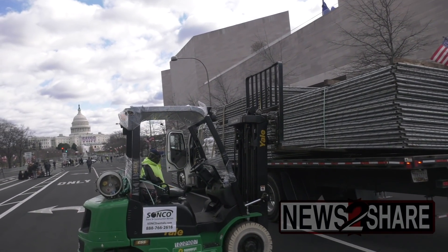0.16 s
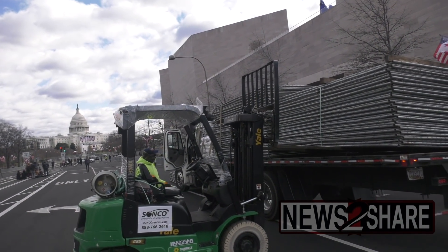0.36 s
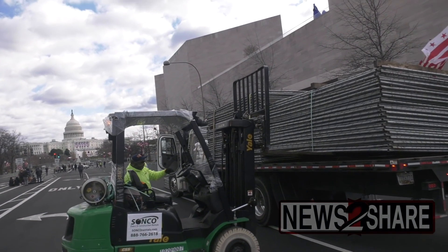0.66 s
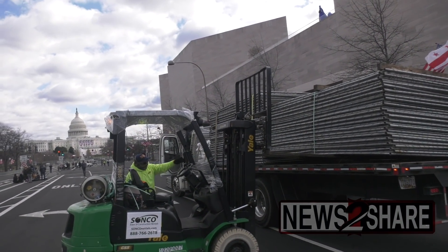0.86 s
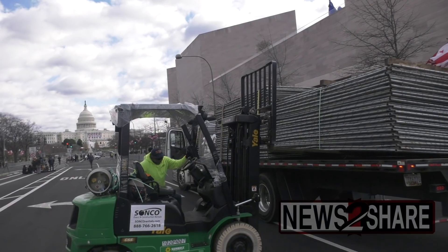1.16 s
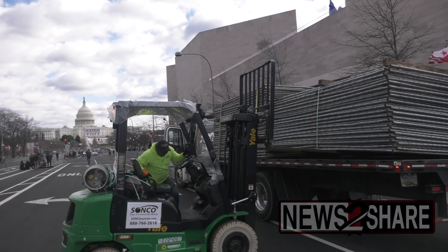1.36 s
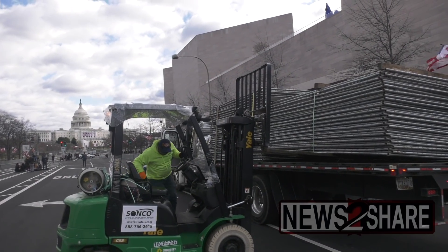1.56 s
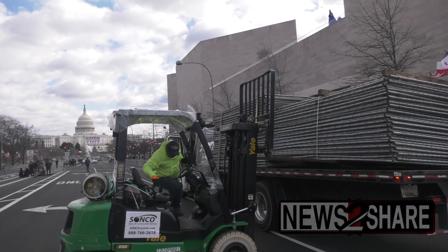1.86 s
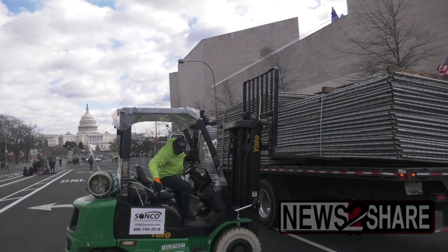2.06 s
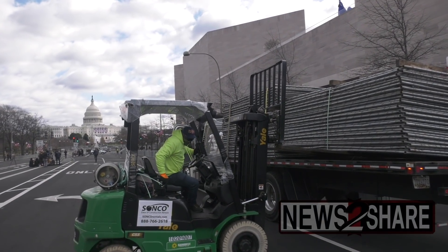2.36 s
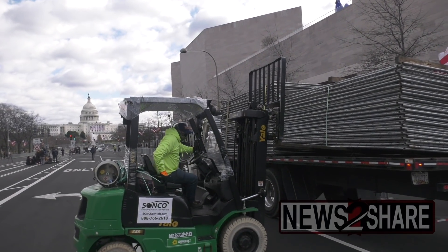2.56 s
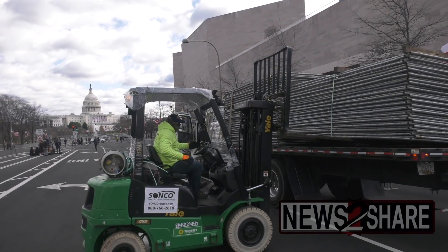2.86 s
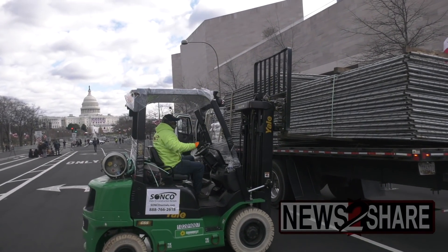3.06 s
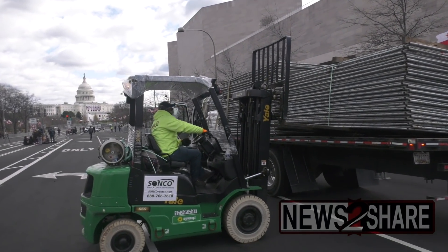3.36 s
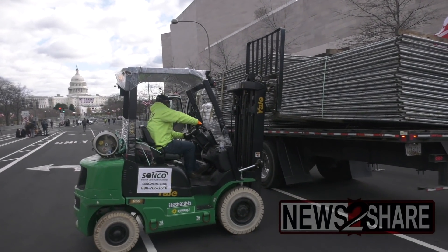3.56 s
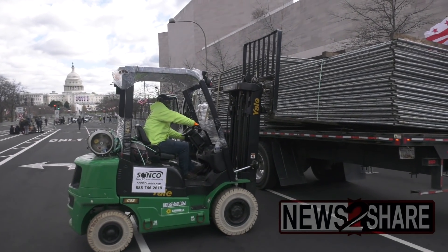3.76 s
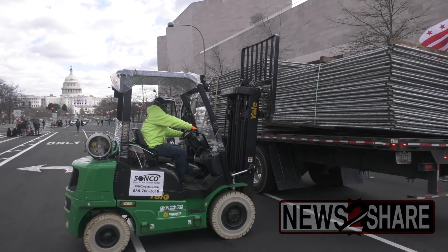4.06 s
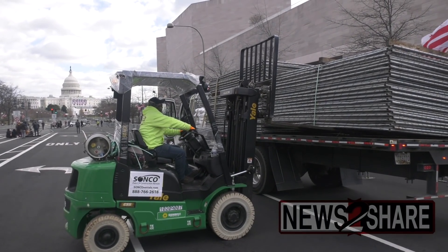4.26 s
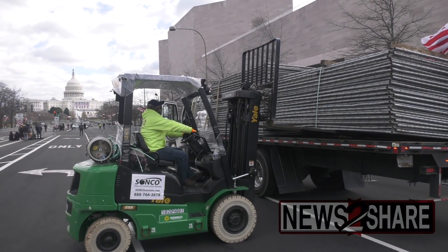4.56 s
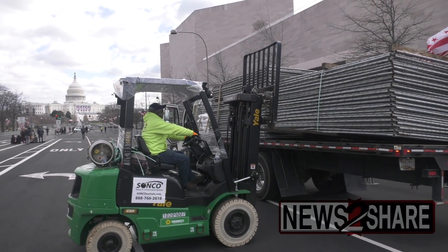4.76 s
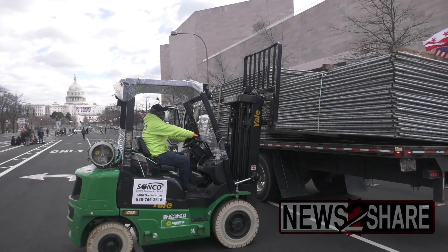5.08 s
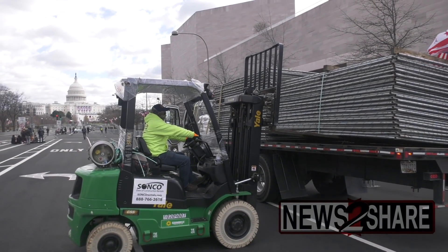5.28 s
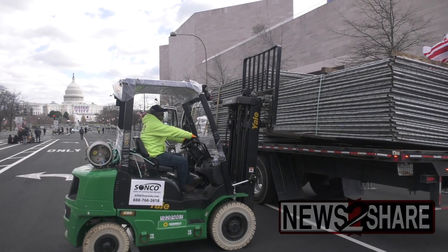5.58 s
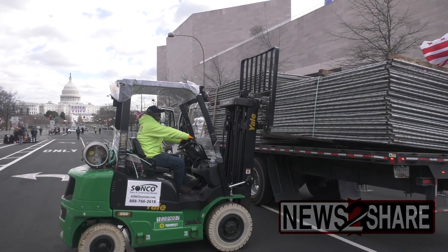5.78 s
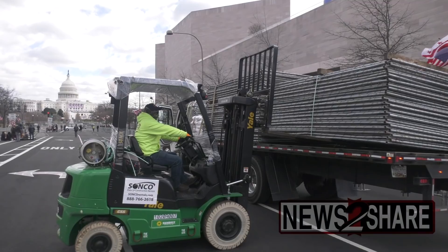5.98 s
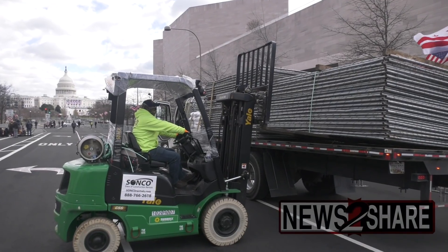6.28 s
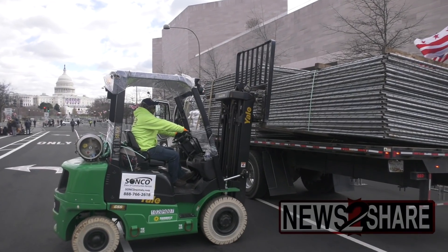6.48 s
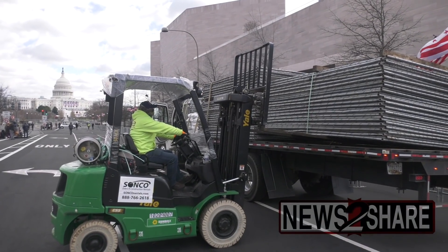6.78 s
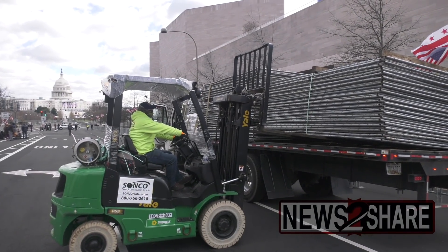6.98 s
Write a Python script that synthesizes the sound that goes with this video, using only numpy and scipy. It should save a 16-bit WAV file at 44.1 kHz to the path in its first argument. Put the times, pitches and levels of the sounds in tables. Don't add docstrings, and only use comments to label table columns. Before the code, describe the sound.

Low wind buffeting dominates an open street as a forklift's pump whines and fan hisses, with a crisp click, faint ticks and rubs.

```python
import sys
import numpy as np
from scipy import signal
from scipy.fft import rfft, irfft, next_fast_len
from scipy.io import wavfile
from scipy.ndimage import uniform_filter1d

SR = 44100
rng = np.random.default_rng(int(sys.argv[2]) if len(sys.argv) > 2 else 0)


def dump_mix(stems):
    frames = np.atleast_2d(stems).T
    limited = np.clip(frames, -1, 1)
    pcm = np.round(limited * 32767).astype(np.int16)
    wavfile.write(sys.argv[1], SR, pcm)


def volts(x):
    e = np.asarray(x, float) / 20
    return 10 ** e


N = 314433
T = np.arange(N) / SR
SIZE = next_fast_len(N)
HZ = np.fft.rfftfreq(SIZE, 1 / SR)
TEETH_PER_FIRING = 6


def curve(table):
    s, *columns = np.transpose(table)
    return [np.interp(T, s, column) for column in columns]


def colour(points):
    hz, db = np.transpose(points)
    return volts(np.interp(np.log(HZ + 1), np.log(hz), db, left=-200, right=-200))


def bell(hz, width_hz):
    return np.exp(-.5 * ((HZ - hz) / width_hz) ** 2)


def noise(gain):
    x = irfft(rfft(rng.standard_normal(SIZE)) * gain, SIZE)[:N]
    return x / np.std(x)


def walk(rate):
    knots = uniform_filter1d(np.repeat(rng.standard_normal(400), 8), size=12)
    return 1.36 * np.interp(T * np.clip(rate, .1, 50) * 8, np.arange(len(knots)), knots)


def swell(s, length_s):
    return np.sin(np.pi * np.clip((T - s) / length_s, 0, 1))


# start_s, sag_hz, bite_s, recover_s
LOADS = [
    (1.72, 2.0, .22, .22),
    (3.76, 1.4, .15, .2),
    (5.74, 2.9, .12, 6),
    (6.74, 3.0, .2, 9),
]


def tooth_rate():
    idle_hz, hunt_hz = 170.8, .4
    hz = idle_hz + hunt_hz * walk(7)
    for s, sag_hz, bite_s, recover_s in LOADS:
        bite = np.clip((T - s) / bite_s, 0, 1)
        hz = hz - sag_hz * bite * np.exp(-np.clip(T - s - bite_s, 0, None) / recover_s)
    return hz


# time_s, state
STANCE = [
    (0, 0),
    (2.2, 0),
    (2.8, 1),
    (5.78, 1),
    (5.86, 2),
    (6.76, 2),
    (6.8, 3),
    (7.13, 3),
]


def in_state(levels_db):
    stance, = curve(STANCE)
    return np.interp(stance, np.arange(len(levels_db)), levels_db)


# tooth_rate_multiple, first_db, second_db, load_db, shift_db
TEETH = [(2, -46, -54, -42, -38), (8, -46.5, -43, -41.5, -47), (11, -60, -60, -59, -68),
         (12, -58, -60, -59, -66), (13, -63, -64, -65, -60), (14, -52, -53, -47, -53),
         (15, -58, -60, -57, -63), (16, -54, -58, -49.5, -55), (18, -57, -64, -67, -62),
         (19, -58, -59, -60, -60), (20, -55, -60, -55, -57), (21, -62, -62, -63, -60),
         (22, -63, -64, -57, -59), (23, -59, -59, -65, -60), (24, -61, -62, -63, -73),
         (25, -66, -60, -66, -73), (26, -62, -64, -76, -74), (27, -59, -60, -64, -65),
         (28, -66, -60, -70, -68), (29, -59, -57, -58, -54), (31, -60, -62, -70, -72),
         (33, -69, -70, -64, -65)]
# tooth_rate_multiple, first_db, second_db, load_db, shift_db
MESH = [(1.27, -43.5, -42, -44, -45), (2.54, -54.5, -61, -48, -47), (3.82, -52.5, -52.5, -58, -61),
        (6.35, -51, -58, -65, -56), (6.85, -51, -52, -51, -56), (12.7, -52.5, -74, -57, -62)]
# tooth_rate_multiple,
# first_db, second_db, load_db, shift_db
TONES = [(39.1, -63, -71, -65, -76), (41.15, -65, -68, -68, -71), (42.9, -75, -61.5, -72, -72),
         (58.8, -75, -76, -76, -76), (26.75, -59.5, -63, -61, -74), (32.3, -58, -65, -74, -76),
         (34.4, -64, -64, -77, -74), (50.8, -72, -68, -72, -72), (54.8, -78, -76, -74, -69),
         (57.5, -65, -67, -71, -78.5), (59.8, -77, -86, -70, -73), (64.8, -76, -74, -76, -73),
         (20, -64, -62, -62, -70), (20.05, -64, -65, -67, -70), (21.92, -58, -60, -67, -70),
            (41, -70, -64, -72, -76), (28.6, -76, -77, -56, -74), (31.8, -76, -68, -62, -74),
            (6.04, -57, -49, -54, -48), (23.6, -74, -74, -62, -66), (29.4, -74, -77, -74, -58),
            (64.1, -73, -76, -78, -78), (58.05, -68, -76, -70, -76)]


def whine(turns):
    firing = 2 * np.pi * turns / TEETH_PER_FIRING
    angle = 2 * np.pi * turns + .015 * np.sin(firing) + .042 * walk(25)
    out = 0
    for order, *levels_db in TEETH + MESH + TONES:
        level_db = in_state(levels_db) + 1.2 * walk(30) + .8 * walk(2)
        shimmer = (.02 + .012 * order + .0007 * order ** 2) * walk(30)
        out = out + volts(level_db) * np.sin(order * angle + shimmer + rng.uniform(0, 7))
    return np.sqrt(2) * volts(-1.5) * out


def hum(turns):
    return volts(-48.5 + 0.84 * walk(1.1)) * np.sin(4 * np.pi * turns)


# pitch_hz, level_db (per Hz)
HISS = [(200, 0.5), (400, -2), (800, -2), (1500, 0), (1800, -12.5), (2900, -15.5), (4200, -17.5),
        (5750, -23.5), (6800, -24.5), (7900, -25), (10800, -25), (11700, -32.5), (13200, -37.5),
        (15700, -44)]
# pitch_hz, width_hz, level_db
PEAKS_AND_DIPS = [(1083, 48, 4), (1253, 17, -1.5), (1498, 36, -4.5), (1676, 24, 3.5), (2280, 358, 8), (3390, 123, 4),
                           (4640, 81, 4.5), (4930, 134, 7.5), (5290, 120, 5), (5554, 130, 8), (5600, 40, -0.5),
                           (6230, 350, 5.5), (9040, 750, 5), (14200, 400, 1),
                           (7620, 90, 2), (7950, 120, -1.5), (8830, 90, -2), (10200, 120, -2), (12500, 180, 1),
                  (13300, 220, -2.5), (14300, 350, 2), (6720, 110, -1.5)]
# time_s, treble_db
FACING = [
    (0, 0.5),
    (.5, 3),
    (1.5, 2),
    (3.3, -0.3),
    (3.8, -3),
    (5.3, -1),
    (6.2, 0),
    (7.13, -1),
]


def hiss_spectrum():
    gain = colour(HISS)
    for hz, width_hz, db in PEAKS_AND_DIPS:
        gain = gain * volts(db * bell(hz, width_hz))
    ripple = uniform_filter1d(rng.standard_normal(len(HZ)), size=500)
    ripple = np.sqrt(500) * uniform_filter1d(ripple, size=300)
    gain = gain * volts(1.3 * ripple * np.clip(HZ / 7000, 0, 1))
    return rfft(noise(gain), SIZE)


def hiss(turns):
    throb, tooth_throb = 0.054, 0.035
    flicker_db, swell_db, drift_db = 0.78, 0.2, 0.5
    treble_db, = curve(FACING)
    spectrum = hiss_spectrum()
    out, shared = 0, walk(5.4)
    for hz in 250 * 2 ** np.arange(0, 6.2, 1 / 3):
        strip = np.clip(1 - 3 * abs(np.log2((HZ + 1) / hz)), 0, 1)
        shared = .8 * shared + .6 * walk(5)
        tilt_db = np.exp(-np.log2(hz / 9000) ** 2 / .3) * treble_db
        level_db = tilt_db + swell_db * shared + flicker_db * walk(12) + drift_db * walk(0.89)
        out = out + irfft(spectrum * strip, SIZE)[:N] * volts(level_db)
    beat = 1 + throb * np.cos(2 * np.pi * turns / TEETH_PER_FIRING)
    beat = beat + tooth_throb * np.cos(2 * np.pi * turns)
    return out * beat * volts(-35)


# pitch_hz, first_db, second_db, load_db, shift_db
VALVE = (4592, -63, -54.5, -56.5, -73)


def valve():
    hz, *levels_db = VALVE
    level_db = in_state(levels_db) + 1.6 * walk(2.6)
    return np.sqrt(2) * volts(level_db) * np.sin(2 * np.pi * hz * T + 1.2 * walk(30))


# start_s, length_s, level_db (rms), pitch_hz,
# width_hz
WHIRRS = [(0.5, 3.1, -67, 9900, 50), (2.0, .9, -61, 9880, 70), (2, 3.1, -62, 9310, 60),
          (.2, .8, -63, 9250, 150), (3.0, 1.8, -70, 10850, 90), (4.2, 1.9, -69, 11480, 110),
          (.3, 1.8, -73, 12250, 110), (3.2, 1.2, -72, 12450, 150), (5.0, 2.3, -77, 13900, 150),
          (6.2, 1.2, -65, 10150, 130), (4, 1.7, -55, 5200, 80), (-.3, 2.2, -59, 5550, 30),
          (2.6, 3.8, -61, 5580, 35), (5.5, 1.1, -56.5, 3500, 120), (6.2, 1, -59, 3700, 90),
          (.1, .9, -62, 5800, 50), (2.0, .9, -60, 6030, 100), (6.3, 1.1, -60, 4480, 100),
          (.6, 1.3, -66, 7050, 45), (3, 3.9, -64.5, 7335, 40), (0, .3, -57, 4590, 30),
          (2.5, 3.3, -63, 5300, 37)]


def whirrs():
    out = 0
    for s, length_s, db, hz, width_hz in WHIRRS:
        rise_and_fade = abs(swell(s, length_s)) ** .5
        out = out + volts(db + 1.5 * walk(8)) * rise_and_fade * noise(bell(hz, width_hz))
    return out


# start_s, level_db (peak), pitch_hz, length_cycles
TICKS = [
    (.71368, -13.5, 2850, 1.27),
    (.7117, -29, 1500, 1.0),
    (2.1032, -26, 2600, 1.3),
    (2.8899, -32, 2500, 2.0),
    (3.5809, -27, 2200, 3.0),
    (3.79, -34, 4300, 2.0),
]
# start_s, length_s, level_db (rms), pitch_hz, width_hz
RUBS = [
    (.7145, .006, -35, 2400, 350),
    (.7135, .003, -38, 4600, 700),
    (2.06, .13, -35.5, 1300, 800),
    (2.1, .015, -38, 2800, 1400),
    (2.1, .05, -43, 5200, 1500),
    (2.37, .07, -46, 2500, 1500),
    (3.574, .022, -37, 2000, 800),
    (3.578, .012, -46, 4000, 1000),
    (3.77, .024, -42, 2300, 500),
    (3.783, .014, -43, 4000, 1100),
]


def small_parts():
    bounce_s, bounce_db = .00115, -9
    out = np.zeros(N)
    for s, db, hz, cycles in TICKS:
        for t, gain in ((T - s, volts(db)), (T - s - bounce_s, volts(db + bounce_db))):
            envelope = np.exp(-.5 * ((t * hz - cycles / 2) / (.42 * cycles)) ** 2)
            out -= gain * envelope * np.sin(2 * np.pi * hz * t)
    for s, length_s, db, hz, width_hz in RUBS:
        out += volts(db) * swell(s, length_s) * noise(bell(hz, width_hz))
    return out


# start_s, length_s, level_db (rms), start_hz, end_hz
SQUEAKS = [
    (.06, .04, -42, 3790, 3660),
    (.088, .055, -48, 3620, 3420),
]


def squeaks():
    out = 0
    for s, length_s, db, start_hz, end_hz in SQUEAKS:
        part = np.clip((T - s) / length_s, 0, 1)
        hz = start_hz + (end_hz - start_hz) * part
        angle = 2 * np.pi * np.cumsum(hz) / SR + 0.82 * walk(50)
        tone = np.sin(angle) + volts(-8) * np.sin(2 * angle)
        out = out + volts(db) * np.sqrt(2) * np.sin(np.pi * part) * tone
    return out


def eddies(points, span_s, even=0.5):
    x = noise(colour(points))
    span = int(span_s * SR)
    power = uniform_filter1d(uniform_filter1d(x * x, span), span)
    return x / (power + 0.016) ** (np.clip(even, 0, 1) / 2)


def bump(s, length_s):
    return np.clip(1 - abs(T - s) / length_s, 0, 1)


# time_s, length_s, big_db, middle_db
SLAPS = [(5.596, 0.11, -4.5, 2), (0.327, 0.045, 7, 1.5), (0.363, 0.043, -8.5, -6), (0.485, 0.089, 8, 3),
         (0.71, 0.086, -5.5, 0), (0.906, .08, 0.5, -2), (0.984, 0.055, -14, -4), (1.044, 0.1, 7, 0.5),
         (1.166, 0.027, -12, 7.5), (1.197, 0.043, 1.5, -1), (1.444, 0.045, -9, -5), (1.475, 0.038, 6, -2),
         (1.588, 0.044, 10.5, -5), (1.666, 0.087, -12, 2), (1.82, 0.12, 5, -1), (1.945, 0.079, -14, 3),
         (2.334, 0.12, 3, -6.5), (6.761, 0.029, -11, 9), (2.47, 0.041, 10, -10), (3.556, 0.048, 13.5, 8.5),
         (4.082, 0.04, -13, -3.5), (4.13, 0.035, 11, 5), (4.484, 0.053, 5, 2), (4.644, 0.12, 0.5, -3.5),
         (5.16, 0.12, -15, 3.5), (5.34, 0.052, 5, 4.5), (5.372, 0.04, -20, -2), (5.856, 0.079, -25, 10.5),
         (6.11, 0.093, 3, 4.5), (6.175, 0.057, -4, -7), (.6, 0.068, 2, -2), (3.24, .1, 4, 0),
         (3.43, .09, -4, 4), (3.63, .06, -3, -1), (5.28, 0.055, 6, 2.5), (5.75, .07, 3.5, -0.5),
         (6.48, .1, 2.5, 0.5), (6.74, 0.074, -1, 4.5), (2.64, .08, 2.5, -2), (3.12, .08, -2, 0),
         (.93, .07, 3.5, 0), (5.85, .06, 0, -4), (6.05, 0.044, -3, -4), (1.42, 0.064, 0, 4),
         (6.92, 0.054, -2, 4.5)]


def slaps():
    big_db, middle_db = 0, 0
    for s, length_s, big, middle in SLAPS:
        shape = bump(s, length_s)
        big_db = big_db + big * shape
        middle_db = middle_db + middle * shape
    return big_db, middle_db


# time_s, middle_db, small_db, smallest_db
RISES_AND_DIPS = [(.02, 4, -5, -2), (.24, 2.5, 3.5, -0.5), (.37, -4, -4, -2), (.49, 0.5, 0.5, 0.5),
                  (.6, -1, 1, -6), (.78, 3, 6, -1.5), (.98, 0.5, -7, -1), (1.32, -6.5, -8, -5), (1.45, 3, -1, -8),
                  (1.8, 1.5, 4.5, -7), (2.28, 5, 2, 1.5), (2.41, -7.5, -7, 0), (2.53, 0.5, -3, 1),
                  (2.65, -1.5, 0.5, -1), (2.88, 4.5, -2, 3), (3.12, 1.5, -1, 6), (3.48, -2.5, -2, -3.5),
                  (3.72, -2, 2.5, -3.5), (3.93, 1.5, -0.5, 3), (4.05, 0, -4, 0.5), (1.2, -0.5, -3, -1),
                  (4.2, 1, -7, -2), (4.33, 1.5, 0, -4), (4.45, -0.5, 3, -2.5), (4.58, -3, -0.5, -5.5),
                  (4.8, -3.5, 2.5, 1), (4.92, -2, 5.5, 2), (5.04, 0.5, -2, 3.5), (5.17, -1.5, -2, -0.5),
                  (5.3, 0.5, -8, -0.5), (5.5, -0.5, 0.5, 2), (5.6, -0.5, 5.5, 3), (5.88, -4.5, -1.5, -1.5),
                  (6.0, -0.5, 3.5, 2.5), (6.24, 3.5, 2.5, -2), (6.36, -2, 0, 4.5), (6.72, -2.5, 0.5, 3),
                  (6.95, 2.5, 4, 1.5)]


def rises_and_dips():
    middle_db, small_db, smallest_db = 0, 0, 0
    for s, middle, small, smallest in RISES_AND_DIPS:
        shape = bump(s, .12)
        middle_db = middle_db + middle * shape
        small_db = small_db + small * shape
        smallest_db = smallest_db + smallest * shape
    return middle_db, small_db, smallest_db


# time_s, force_db, fineness_db (of the eddies)
GUST = [(0.0, -14, -9.5), (0.26, -13.5, -11.5), (0.6, -13.5, -13.5), (0.72, -18.5, -13),
        (0.85, -10.5, -14.5), (1.27, -10, -18), (1.62, -19.5, -16.5), (1.93, -22.5, -14.5),
        (2.1, -13.5, -17.5), (2.6, -21, -13.5), (3.06, -26.5, -14.5), (3.4, -19, -12.5), (3.8, -18, -10.5),
        (4.3, -12, -10.5), (4.75, -14.5, -11), (5.2, -14, -8), (6.3, -16, -10.5), (7.13, -19.5, -10)]
# pitch_hz, level_db (per Hz)
THUMP = [(4, -3.5), (10, -4), (20, 7.5), (31, 3.5), (40, -4.5), (52, -9.5), (90, -63)]
# pitch_hz, level_db (per Hz)
BUFFET = [(30, -12.5), (50, -0.5), (65, -3.5), (100, -6.5), (140, -14), (220, -37)]
# pitch_hz, level_db (per Hz)
RUMBLE = [(90, -14.5), (140, -1), (170, -1), (250, -5), (350, -11), (550, -23), (900, -32.5)]
# pitch_hz, level_db (per Hz)
FLUTTER = [(250, -21), (350, -12.5), (450, -13), (650, -15), (1000, -16)]


def wind():
    force_db, fine_db = curve(GUST)
    finer_db = fine_db - fine_db.mean()
    big_db, slap_db = slaps()
    brief_db, small_db, smallest_db = rises_and_dips()
    middle_db = slap_db + brief_db

    thump_db = force_db - 1.5 - 0.23 * finer_db + big_db
    buffet_db = force_db - 4 + 0.44 * finer_db + middle_db + 2.13 * walk(9)
    rumble_db = force_db + fine_db + 1.2 * walk(11)
    thump = eddies(THUMP, span_s=0.14) * volts(thump_db)
    buffet = eddies(BUFFET, span_s=0.087) * volts(buffet_db)
    rumble = eddies(RUMBLE, span_s=0.053, even=0.14) * volts(rumble_db)

    highpass = 1 / (1 + (230 / (HZ + 1)) ** 6)
    top = irfft(rfft(rumble, SIZE) * highpass, SIZE)[:N]
    rumble = (rumble - top) * volts(small_db) + top * volts(smallest_db)

    slow_rumble_db = uniform_filter1d(rumble_db, size=8000)
    flutter_db = -44.5 + smallest_db + 0.99 * (slow_rumble_db + 22.5)
    flutter = noise(colour(FLUTTER)) * volts(flutter_db)
    fade_in = np.clip(T / .004, 0, 1)
    return (thump + buffet + rumble + flutter) * fade_in


def scene():
    turns = np.cumsum(tooth_rate()) / SR
    gusts = wind()
    gusts = gusts / (1 + (gusts / .73) ** 6) ** (1 / 6)
    engine = whine(turns) + hum(turns) + hiss(turns) + valve() + whirrs()
    mono = engine + small_parts() + squeaks() + gusts
    return mono * np.array([[4 / 3], [2 / 3]])


def top_cut(x):
    return signal.sosfilt(signal.butter(12, 15890, fs=SR, output="sos"), x)


def record(dry):
    top = np.array([[1], [.5]])
    mix = np.clip(dry, -top, top)
    return top_cut(mix)


dry = scene()
out = record(dry)
dump_mix(out)
```